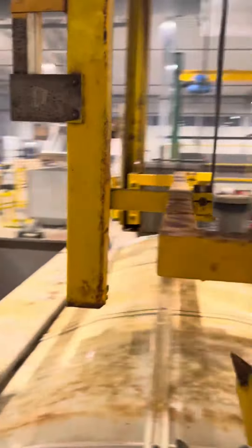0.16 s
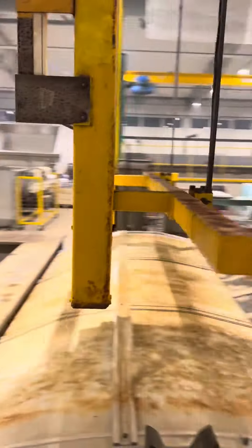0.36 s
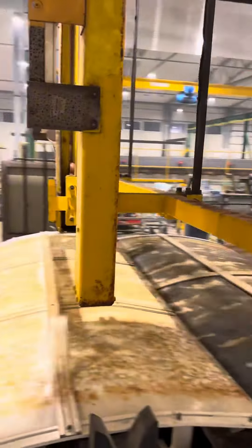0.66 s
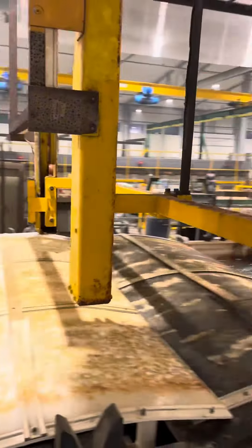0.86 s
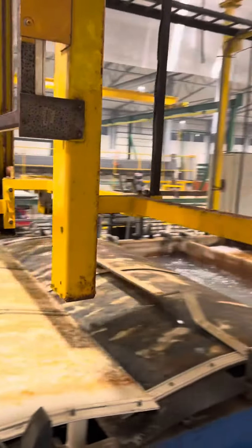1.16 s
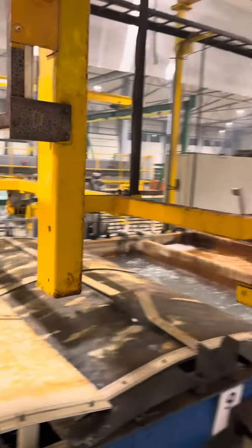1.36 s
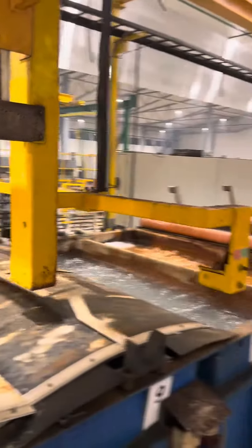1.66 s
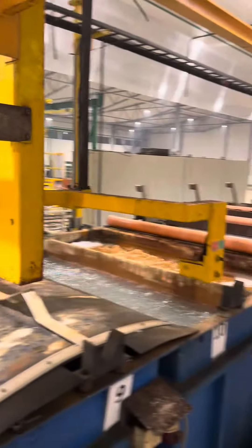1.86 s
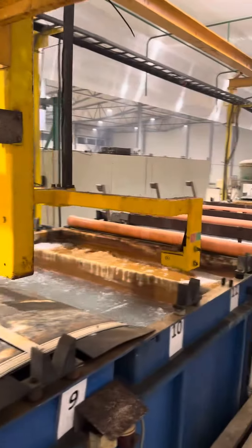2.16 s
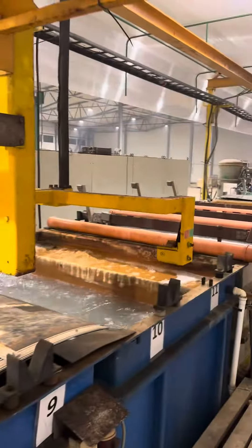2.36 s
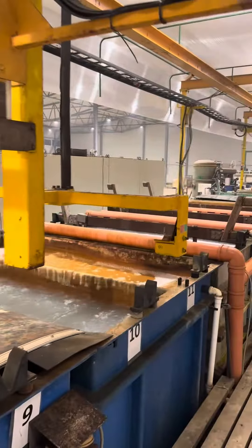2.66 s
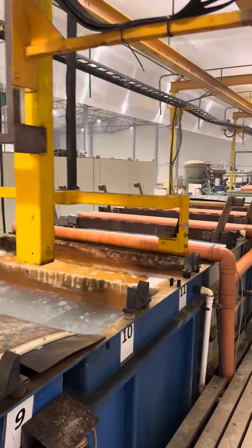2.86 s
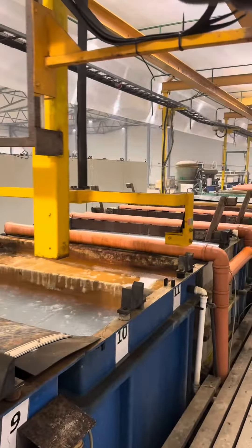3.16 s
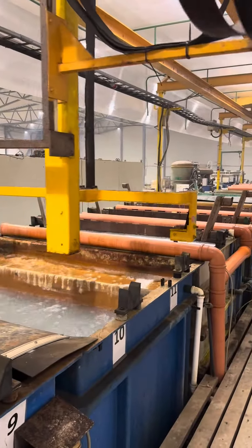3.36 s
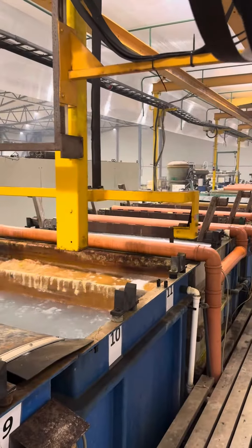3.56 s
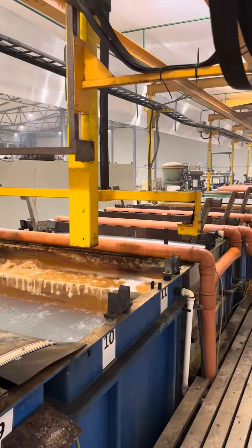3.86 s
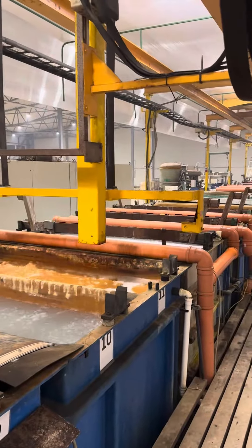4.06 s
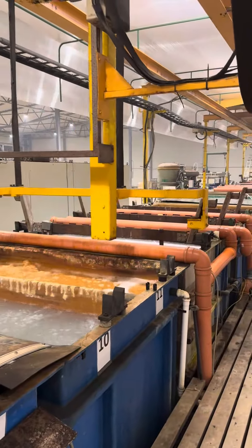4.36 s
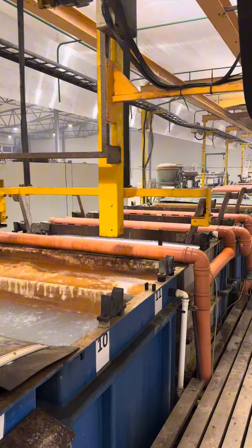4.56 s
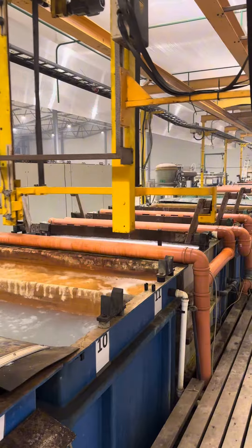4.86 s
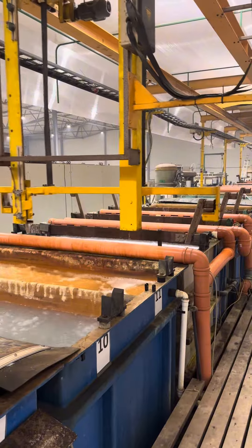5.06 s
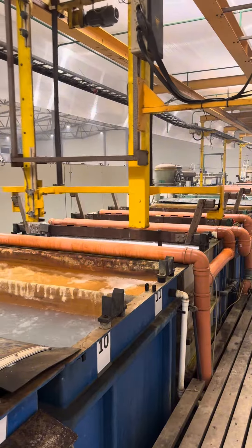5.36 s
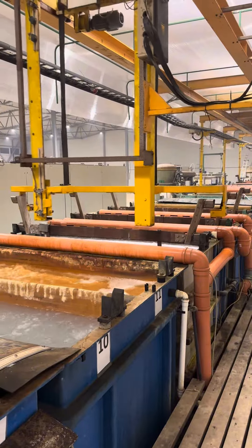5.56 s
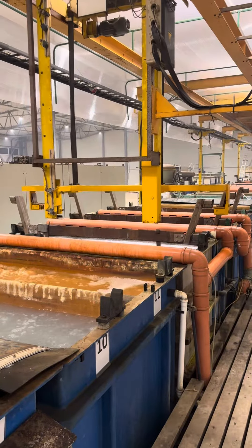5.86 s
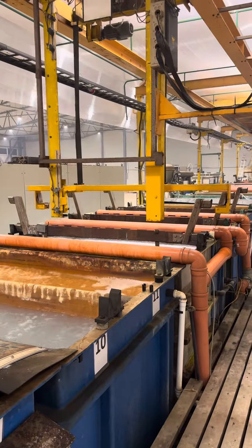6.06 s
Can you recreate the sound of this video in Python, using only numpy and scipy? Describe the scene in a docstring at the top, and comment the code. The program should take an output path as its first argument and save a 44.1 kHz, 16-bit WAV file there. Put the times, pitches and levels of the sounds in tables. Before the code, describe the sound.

A constant, dull ventilation drone fills a reverberant industrial hall. At first, hoist wheels and gears grind along nearby at left; they fade while the handheld stereo microphone swings to an even balance. From about three seconds, stirred liquid with tiny bubbles becomes clearer, and a high hiss flares in patches before sinking near the end. Thin drive tones stay faint throughout.

```python
"""Inside a large plating hall, on a hand-held pair of microphone ports; fans, pumps and a faint drive whine run throughout.
At first the pair is left-heavy and a hoist rolls close by on the left; the hand turns to a slightly right-heavy rest.
After 1.4 s the hoist draws away: noise and gear tones fade together. A narrow hiss, in phase at both ports, sinks.
From about 3 s the pumps' churn, noise with rising bubble notes, swells; the narrow hiss is louder from about 3.5 to 5 s.
It sinks again near the end, under a wide bath hiss. The drone is duct noise with narrow-band hums; the whine is sines."""
import sys
import numpy as np
from scipy import signal
from scipy.io import wavfile
from scipy.ndimage import uniform_filter1d

SR = 44100
rng = np.random.default_rng(int(sys.argv[2]) if len(sys.argv) > 2 else 0)


def digitize_waveform(pressure):
    """Quantize a signal to 16-bit integers and store it at the path in sys.argv[1].

    Rows of a 2-D input are taken as channels; values are limited to [-1, 1].
    """
    field = np.atleast_2d(pressure).T
    bounded = np.clip(field, -1, 1)
    quanta = np.round(bounded * 32767).astype(np.int16)
    wavfile.write(sys.argv[1], SR, quanta)


N = 273861

# Spectrum of the extractor duct roar. Each row: frequency in Hz, relative density in dB per Hz.
DRONE_SPECTRUM = [(15, -75), (30, -33), (45, -11.5), (85, -5), (115, -8.5), (135, -3.5), (150, -8),
                  (190, -3), (225, -3.5), (265, -5.5), (300, -9), (335, -6.5), (352, -9.5), (388, -11.5),
                  (415, -6.5), (470, -11), (490, -8), (540, -11.5), (715, -12), (820, -14.5), (860, -12),
                  (930, -15), (990, -18), (1200, -16.5), (1440, -23), (2300, -39.5), (4000, -59.5)]
# Fan and pump hums, blurred by the hall.
# Each row: frequency in Hz, level in dB rms, width in Hz, phase by which the left port leads in radians.
FAN_HUMS = [(94, -36.5, 16, 0), (163, -40, 8, 0), (195, -38, 10, 0), (218, -38, 10, 0), (236, -39, 6, 0),
            (248, -33.5, 8, 0), (262, -39, 6, 0), (371, -38, 3, .4), (492, -43, 14, 1.8),
            (741, -42.5, 4, 2.0), (925, -48, 25, 1.5), (1060, -51, 8, 1.8), (1108, -47, 5, 1.8),
            (1443, -49.5, 3, .6), (2646, -59, 5, 2.8)]
# Levels of roar and churn, before hums and bubbles are added.
# Each row: time in seconds, drone level in dB, churn level in dB.
DRONE_AND_CHURN_LEVELS = [(0, -21.5, -32.5), (.4, -20.5, -35), (.8, -21, -34), (1.25, -21.5, -34),
                          (1.5, -22, -34.5), (1.8, -21, -35.5), (2.2, -22.5, -35.5), (2.5, -23, -36),
                          (2.75, -23, -33.5), (2.95, -22, -34.5), (3.4, -22.5, -32.5), (3.7, -22.5, -32.5),
                          (4.1, -22.5, -31.5), (4.5, -23, -31.5), (5.0, -21.5, -32), (5.5, -21.5, -32.5),
                          (5.8, -22, -33), (6.21, -20.5, -35)]

# Spectrum of the hoist's rumble. Each row: frequency in Hz, relative density in dB per Hz.
HOIST_SPECTRUM = [(90, -24), (150, -2), (185, 8.5), (240, -3.5), (290, -4), (380, 2.5), (460, -5), (600, 0),
                  (820, -5.5), (930, -1), (975, -11), (1300, -9.5), (2000, -18), (2500, -26.5), (3000, -31),
                  (4600, -48), (5700, -26.5), (6600, -33), (8000, -83)]
# How far the hoist reaches the left port first. Each row: frequency in Hz, left lead in radians.
HOIST_PORT_LEAD = [(100, 0), (210, 0.83), (300, 1.1), (430, 2.3), (640, 0.41), (860, 1.5), (1550, 0.18),
                   (1950, 0.065), (2400, 1.5), (3300, 1.4), (4000, 0.69), (5200, 0)]
# Gear whine of the hoist, before it recedes.
# Each row: frequency in Hz, level in dB rms, pitch wander in Hz, left lead in radians.
GEAR_TONES = [(2000, -56, 5, 2), (2621, -55, 2, 2), (2646, -57, 2, 2)]
# The rumble starts at this level; it recedes slowly alongside, then the fade adds to that loss.
HOIST_START_DB, HOIST_RECEDES_DB_PER_S = -26, 1.5
HOIST_LEAVES_S, HOIST_FADE_DB_PER_S = 1.43, 8.5

# Spectrum of the pumps and stirred liquid. Each row: frequency in Hz, relative density in dB per Hz.
CHURN_SPECTRUM = [(600, -23.5), (1100, -5), (1600, -2.5), (1900, -4.5), (2300, -2.5), (2660, -4.5),
                  (2800, -6.5), (3100, -9.5), (4000, -15), (5000, -16), (7000, -44)]
# Air bubbles breaking in the baths: mean rate, range of starting pitches, level against the churn wash.
BUBBLES_PER_S, BUBBLE_LOW_HZ, BUBBLE_HIGH_HZ, BUBBLES_UNDER_CHURN_DB = 320, 599.2, 2906, -3.5
# One note: length in cycles of its starting pitch, and the share of extra cycles gained by its end.
BUBBLE_CYCLES, BUBBLE_RISE = 20.2, 0.041
BUBBLE_SPREAD_DB, BUBBLE_TILT_DB_PER_OCTAVE = 3, -5

# Spectrum of the wide bath hiss. Each row: frequency in Hz, relative density in dB per Hz.
WIDE_HISS_SPECTRUM = [(1500, -8.5), (3000, -3), (4000, 0), (5000, -5), (5600, -1), (6300, -3), (7900, -3.5),
                      (8700, 0), (10000, -6.5), (11500, 0.5), (14000, -1.5), (16000, 0)]
# Level of the wide hiss, before its flutter. Each row: time in seconds, level in dB.
WIDE_HISS_LEVEL = [(0, -39.5), (1.1, -39), (2.7, -38.5), (2.85, -37), (3.34, -38), (3.52, -37),
                   (3.65, -37.5), (3.98, -34), (4.12, -38.5), (4.22, -33), (4.88, -35), (5.0, -35),
                   (5.3, -35), (5.74, -38), (6.21, -35.5)]
# Spectrum of a narrower hiss, around 5 to 8.5 kHz. Each row: frequency in Hz, relative density in dB per Hz.
NARROW_HISS_SPECTRUM = [(3000, -22.5), (5000, -4), (7000, 6), (7900, 7), (8500, -1), (9500, -56)]
# Level of the narrower hiss, before its flutter: uneven, louder from about 3.5 to 5 s.
# Each row: time in seconds, level in dB.
NARROW_HISS_LEVEL = [(0, -46), (.8, -51.5), (1.76, -52), (1.85, -55), (2.75, -53), (2.81, -47), (2.93, -47),
                     (3.0, -46), (3.05, -52), (3.37, -51), (3.52, -41), (3.63, -44), (3.81, -42),
                     (3.9, -43), (4.0, -39), (4.11, -44), (4.27, -41), (4.66, -43), (4.75, -42),
                     (4.95, -45.5), (5.02, -48), (5.73, -55), (6.2, -50)]
WIDE_FLUTTER_DB, NARROW_FLUTTER_DB = 0.5, 0.5  # rms

# Whine of the motor drive.
# Each row: frequency in Hz, level in dB rms, pitch wander in Hz, left lead in radians.
DRIVE_WHINE = [(2621, -56.5, 2, 2.5), (5292, -66, 3, 0), (6949, -66.5, 9, 0), (7143, -65, 6, -.3),
               (7885, -59, 2.5, -1.4), (8099, -62, 3, -1.4), (8850, -70, 3, -2)]

# Likeness, phase lead and balance of left and right by frequency; opposite in sign from 10.35 to 13.6 kHz.
# Each row: frequency in Hz, likeness from 0 to 1, left lead in radians, left over right in dB.
PORT_PAIR = [(60, 1, 0, 0), (250, .96, -.1, -1.5), (330, .84, 0, -3), (400, .68, 0, -3), (450, .44, .5, -3),
             (600, .55, .8, 1), (680, .48, 1, 0), (780, .3, 1, -1), (950, .15, 1.2, -1),
             (1100, .3, 1.9, -1), (1350, .35, 1, -1), (1550, .35, .4, -2), (1750, .52, .2, -2),
             (1950, .4, -.1, -1.5), (2150, .05, 0, 0), (2200, .05, 2.9, 0), (2550, .52, 2.8, -1),
             (3000, .48, 2.8, 0), (3350, .05, 2.9, -1), (3400, .05, 0, -1), (3900, .35, -.2, -1),
             (4300, .14, 0, -1), (4800, .1, 0, -1), (5150, .4, 0, 0), (5500, .95, 0, 0), (5900, .98, 0, 0),
             (6900, .95, 0, 0), (7500, .5, -.6, 0), (8000, .5, -1.3, 0), (8500, .5, -1.7, 0),
             (9000, .5, -2, 0), (9600, .62, -2.5, 0), (10050, .85, -2.8, 0), (10350, 1, -np.pi, 0),
             (13600, 1, -np.pi, 0), (13900, .72, -3.6, 0), (14800, .6, -4.3, 0), (15500, .5, -4.8, 0)]
RIDGES_DB = 2.14  # depth of the hall's standing-wave ridges, rms
# Left over right at the first moment and at rest, and the time constant of the turn.
LEAN_START_DB, LEAN_REST_DB, TURN_S = 4.5, -0.3, .7
UPPER_EDGE_HZ = 15760


def drone():
    """Air roar of the extractor ducts, spread over both ports, with the fan hums riding in it."""
    roar = in_hall(DRONE_SPECTRUM, patchy_db=0.1, size=4096)
    return gain_of(follow(DRONE_AND_CHURN_LEVELS)) * roar + hums()


def hums():
    """Each hum is noise squeezed into a narrow band round a steady core, so it beats and breaks up at random."""
    t = np.arange(N) / SR
    out = np.zeros((2, N))
    like, step = 0.97, 8  # likeness of the ports; the slow envelope holds each value for 8 samples
    for hz, db, width, lead in FAN_HUMS:
        pole = np.exp(-np.pi * width / (SR / step))
        noise = rng.standard_normal((4, N // step + 2000))  # the extra start lets the filter settle
        a, b, c, d = signal.lfilter([1], [1, -2 * pole, pole * pole], noise)[:, -N // step:]
        left = evened(a) + 1j * evened(b) + 1.65  # a steady core under the blur
        other = evened(c) + 1j * evened(d)
        right = like * left * np.exp(-1j * lead) + np.sqrt(1 - like ** 2) * other
        both = np.array([left, right])
        both = gain_of(db) * both / np.sqrt(np.mean(abs(both) ** 2) / 2)
        envelope = np.repeat(both, step, axis=1)[:, :N]
        out += (envelope * np.exp(2j * np.pi * hz * t)).real
    return out


def hoist():
    """Wheels and gearbox rumbling on the rail: one near source, favouring the left port, that draws away."""
    rumble = wash(HOIST_SPECTRUM, np.ones_like, lambda hz: read(HOIST_PORT_LEAD, hz), patchy_db=0.5, size=2048)
    leftward = gain_of([[1.5], [-1.5]])
    near = gain_of(HOIST_START_DB) * rumble * leftward + tones(GEAR_TONES, waver_db=3.0)
    t = np.arange(N) / SR
    loss_db = HOIST_RECEDES_DB_PER_S * t + HOIST_FADE_DB_PER_S * np.maximum(t - HOIST_LEAVES_S, 0)
    return gain_of(-loss_db) * near


def churn():
    """Pumps and stirred liquid: a mid wash with bubbles that sinks, then swells with the hiss."""
    liquid = in_hall(CHURN_SPECTRUM, patchy_db=1.3, size=1024)
    stirred = liquid + gain_of(BUBBLES_UNDER_CHURN_DB) * bubbles(count=36)
    return gain_of(follow(DRONE_AND_CHURN_LEVELS, order=2)) * stirred


def bubbles(count):
    """Each size of bubble rings a short rising note, nearer one port or the other."""
    out = np.zeros((2, N))
    kind = rng.integers(0, count, N)
    strength = gain_of(BUBBLE_SPREAD_DB * np.minimum(rng.exponential(1, N), 4))
    bursts = strength * (rng.random(N) < BUBBLES_PER_S / SR)
    for k, hz in enumerate(np.geomspace(BUBBLE_LOW_HZ, BUBBLE_HIGH_HZ, count)):
        turns = np.arange(0, BUBBLE_CYCLES, hz / SR)
        share = turns / BUBBLE_CYCLES
        swell = np.sin(np.pi * share ** 0.67) ** 2
        note = swell * np.sin(2 * np.pi * turns * (1 + BUBBLE_RISE * share))
        note *= gain_of(BUBBLE_TILT_DB_PER_OCTAVE * np.log2(hz / BUBBLE_LOW_HZ))
        out[k % 2] += signal.oaconvolve(bursts * (kind == k), note)[:N]
    return evened(out + 0.39 * out[::-1])  # the farther port hears each note weaker


def hiss():
    """Fine bubbles bursting on the baths: a wide hiss, and a narrower uneven one, the same noise at both ports."""
    wide = in_hall(WIDE_HISS_SPECTRUM, patchy_db=2.5, size=1024)
    wide_db = follow(WIDE_HISS_LEVEL) + WIDE_FLUTTER_DB * drift(10)
    narrow = wash(NARROW_HISS_SPECTRUM, np.ones_like, np.zeros_like, patchy_db=1.0, size=512)
    narrow_db = follow(NARROW_HISS_LEVEL) + NARROW_FLUTTER_DB * drift(14)
    return gain_of(wide_db) * wide + gain_of(narrow_db) * narrow


def whine():
    """Faint motor drive: thin steady tones that wander slightly in pitch and level."""
    return tones(DRIVE_WHINE, waver_db=1.5)


def in_hall(colour, patchy_db, size):
    """Noise with the likeness and phase lead of the port table."""
    return wash(colour, lambda hz: read(PORT_PAIR, hz), lambda hz: read(PORT_PAIR, hz, order=2), patchy_db, size)


def wash(colour, like, lead, patchy_db, size):
    """Random short-time spectra with drifting patches, at the two ports, scaled to rms 1."""
    frames = 4 * N // size + 5
    hz = np.fft.rfftfreq(size, 1 / SR)
    a, b, c, d, patches = rng.standard_normal((frames, len(hz), 5)).T  # each is frequency by time
    patches = evened(uniform_filter1d(uniform_filter1d(patches, size=12, axis=0), size=6, axis=1))
    # standing waves of the hall: narrow ridges that shift slowly
    ridges = uniform_filter1d(rng.standard_normal(a.shape), size=2, axis=0)
    ridges = evened(uniform_filter1d(ridges, size=40960 // size, axis=1))
    like = like(hz)[:, None]
    left = a + 1j * b
    right = like * left * np.exp(-1j * lead(hz))[:, None] + np.sqrt(1 - like ** 2) * (c + 1j * d)
    lean = gain_of(read(PORT_PAIR, hz, order=3) / 2)[:, None]
    level_db = read(colour, hz)[:, None] + patchy_db * patches + RIDGES_DB * ridges
    spectra = np.array([left * lean, right / lean]) * gain_of(level_db)
    return evened(signal.istft(spectra, nperseg=size, noverlap=3 * size // 4)[1][:, :N])


def tones(table, waver_db):
    """Steady partials whose pitch wanders and whose level wavers at each port as echoes shift."""
    out = np.zeros((2, N))
    for hz, db, wander, lead in table:
        angle = 2 * np.pi * np.cumsum(hz + wander * drift(5.6)) / SR
        shared = drift(7.0)
        for side in range(2):
            level_db = db + waver_db * (shared + 0.73 * drift(2.8))
            out[side] += np.sqrt(2) * gain_of(level_db) * np.sin(angle - side * lead)
    return out


def drift(per_s):
    """Slow random movement of rms 1: sines of random phase, the fastest at per_s cycles a second."""
    t = np.arange(0, N + 256, 256) / SR
    rates = np.geomspace(per_s / 20, per_s, 24)
    slow = sum(np.sin(2 * np.pi * (f * t + rng.random())) / np.sqrt(f) for f in rates)
    return np.interp(np.arange(N) / SR, t, evened(slow))


def gain_of(db):
    """Decibels to amplitude."""
    return np.exp(np.asarray(db) * np.log(10) / 20)


def evened(x):
    """Scaled to rms 1."""
    return x / np.sqrt(np.mean(x ** 2) + 1e-20)


def read(points, hz, order=1):
    """One column of a table, joined on a log-frequency axis."""
    points = np.transpose(points)
    return np.interp(np.log(hz + 1), np.log(points[0] + 1), points[order])


def follow(rows, order=1):
    """One column of a time curve at every sample."""
    rows = np.transpose(rows)
    return np.interp(np.arange(N) / SR, rows[0], rows[order])


def scene():
    """All sources of the hall at the two ports."""
    return drone() + hoist() + churn() + hiss() + whine()


def record(dry):
    """The balance of the middle range follows the panning hand; the ports share the bass. Then the band limits."""
    middle = signal.sosfiltfilt(signal.butter(3, [260, 5000], "band", fs=SR, output="sos"), dry)
    turn = np.exp(-np.arange(N) / SR / TURN_S)
    lean_db = LEAN_REST_DB + (LEAN_START_DB - LEAN_REST_DB) * turn
    lean = gain_of(lean_db / 2 * np.array([[1], [-1]]))
    left, right = dry + middle * (lean - 1)
    # below 205 Hz the difference between the ports falls away
    side = signal.sosfiltfilt(signal.butter(3, 205, "high", fs=SR, output="sos"), left - right) / 2
    heard = (left + right) / 2 + np.array([side, -side])
    heard = signal.sosfilt(signal.butter(2, 35, "high", fs=SR, output="sos"), heard)
    treble_limit = signal.firwin(2047, UPPER_EDGE_HZ, window=("kaiser", 9), fs=SR)
    return signal.oaconvolve(heard, treble_limit[None], "same")


dry = scene()
out = record(dry)
digitize_waveform(out)
```